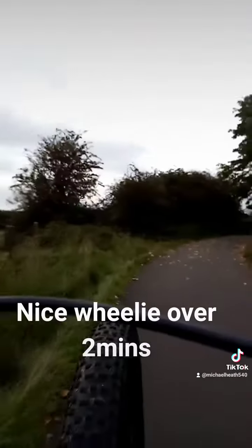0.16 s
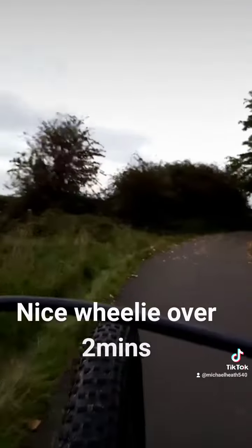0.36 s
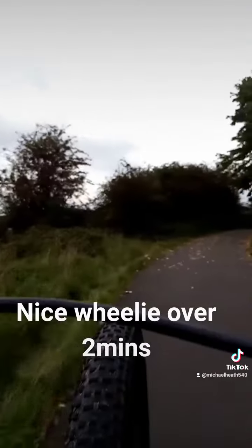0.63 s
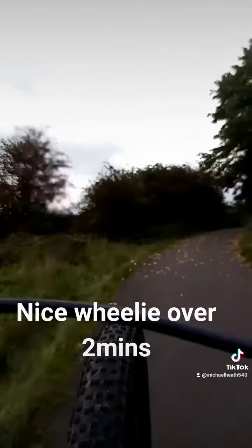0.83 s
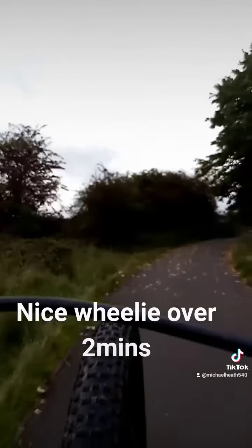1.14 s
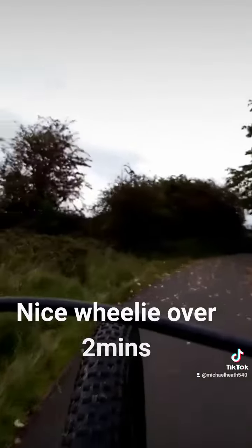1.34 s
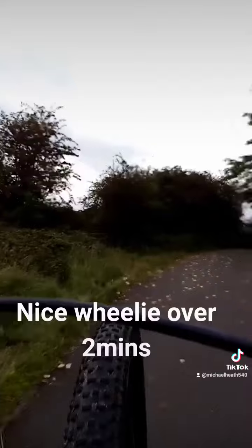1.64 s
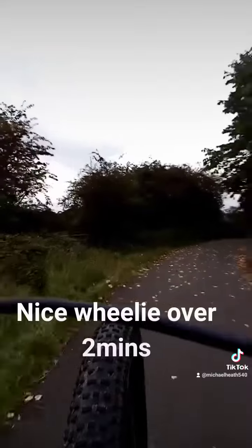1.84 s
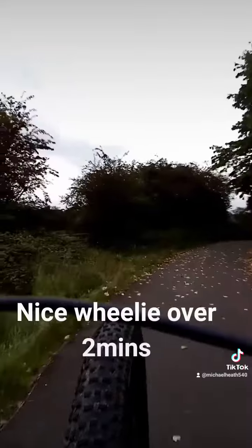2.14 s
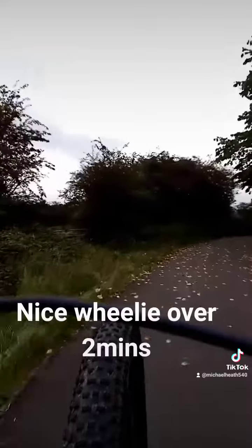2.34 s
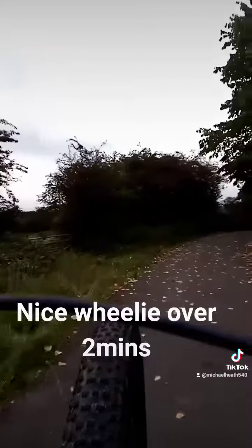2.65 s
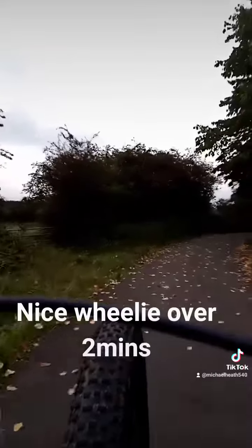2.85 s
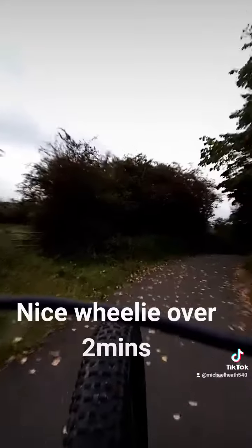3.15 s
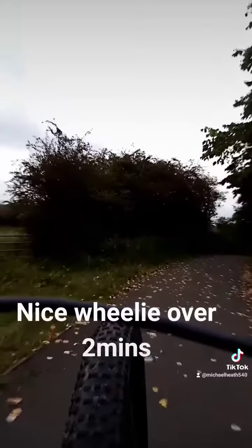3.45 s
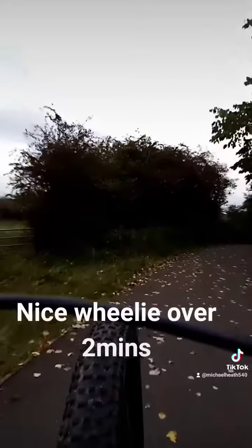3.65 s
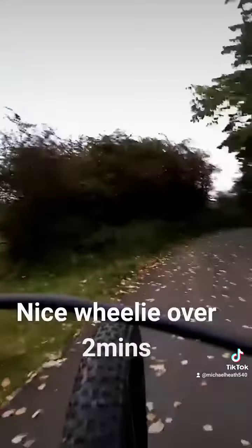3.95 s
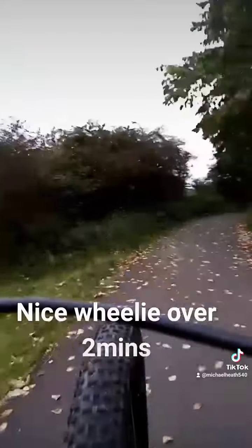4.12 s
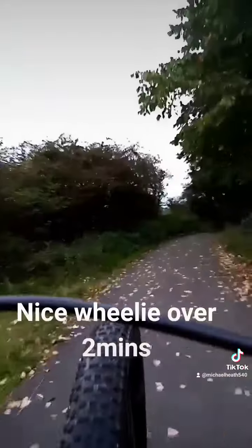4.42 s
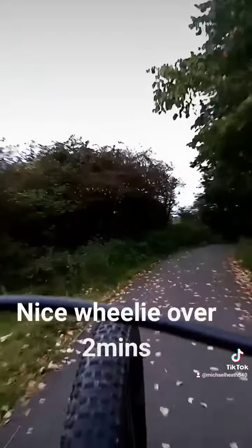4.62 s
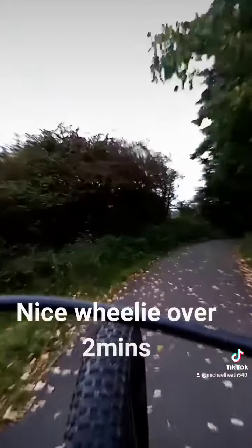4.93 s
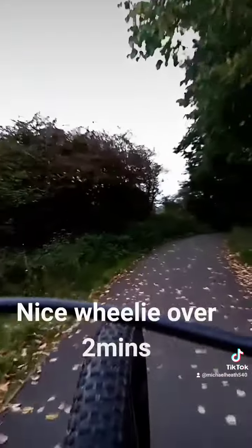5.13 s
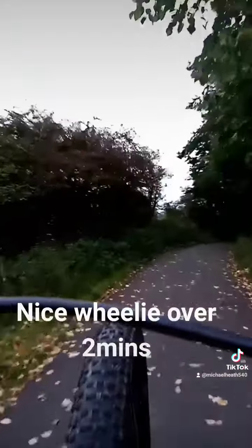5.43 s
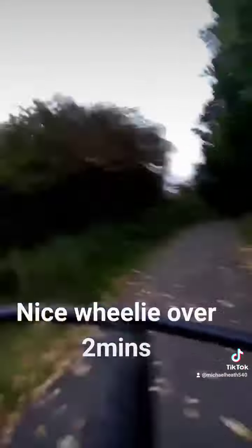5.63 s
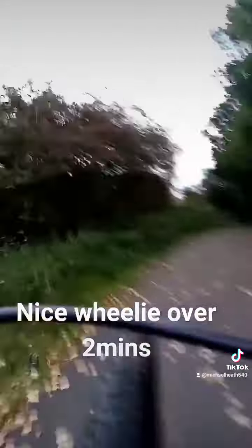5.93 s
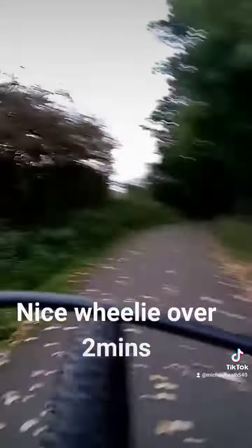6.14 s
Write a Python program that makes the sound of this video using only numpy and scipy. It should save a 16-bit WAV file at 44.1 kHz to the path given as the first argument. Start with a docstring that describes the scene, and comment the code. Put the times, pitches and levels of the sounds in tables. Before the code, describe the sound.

A bicycle rolls along a leafy tarmac path, heard close by a phone moving with the rider. Low headwind buffets the microphone over faint tyre roar and hiss. Two piercing stone pings come just before one second, followed by grit snaps and leaf crackles. The freewheel ticks rapidly around three seconds, then a clatter. Near the end, more ticks lead into a dense burst of loud cracks, knocks and stronger wind.

```python
"""A bicycle rolls along a leaf-strewn tarmac path, heard by a phone carried by the rider.
Its knobbly tyre roars and hisses as fluttering coloured noise; leaves, grit and frame taps are crackling bursts.
The freewheel ticks in bright ringing bursts while the pedals rest; the chain clicks faintly and thinly.
Headwind buffets the two microphone ports as gusting low noise and swings of pressure; a small bird whistles
falling tones. The left port is muffled and nearer."""
import sys
import numpy as np
from scipy import signal
from scipy.fft import rfft, irfft
from scipy.io import wavfile
from scipy.ndimage import uniform_filter1d

SR = 44100
rng = np.random.default_rng(int(sys.argv[2]) if len(sys.argv) > 2 else 0)


def linear_from_db(decibels):
    """Turn decibels (scalar or array-like) into linear amplitude factors; 0 gives 1."""
    return 10 ** (np.asarray(decibels, float) / 20)


def wav_record(signal):
    """Record a signal, one row per channel, as 16-bit PCM in the file named by sys.argv[1]."""
    frames = np.transpose(np.atleast_2d(signal))
    bounded = np.clip(frames, -1, 1)
    # unit amplitude maps onto the largest positive 16-bit level
    quanta = np.round(bounded * 32767).astype(np.int16)
    wavfile.write(sys.argv[1], SR, quanta)


N = 276948
TIME = np.arange(N) / SR  # seconds
TOP_FADE_DB_PER_S = 1  # the highest treble thins out along the path

# Levels are relative: each layer sets its own gain on top.
# Rolling. Each row: time in seconds, tyre load in dB, grit under the tread in dB.
ROLLING = [(0.0, -66.5, -67.5), (0.47, -65, -70.5), (0.96, -64.5, -62), (1.12, -65.5, -69.5),
           (1.36, -66, -72), (1.48, -64.5, -73.5), (1.85, -66.5, -69.5), (2.04, -67, -76.5),
           (2.66, -65, -68.5), (3.27, -64.5, -71.5), (3.97, -64.5, -69.5), (4.35, -62.5, -66.5),
           (4.98, -62, -72), (5.37, -64, -65), (5.56, -65, -63.5), (5.68, -60, -59), (5.96, -60.5, -65.5),
           (6.28, -56.5, -65)]
# Low roar of the tyre. Each row: frequency in Hz, level in dB.
ROAR_COLOUR = [(140, 5), (190, 22), (250, -9.5), (500, 0), (690, -1), (780, 5), (880, 2.5), (1200, 0.5),
               (1900, -13), (2250, -7), (2750, -9), (3050, -32), (4000, -26), (6000, -35.5)]
# Gritty hiss of the tread. Each row: frequency in Hz, level in dB.
HISS_COLOUR = [(1000, -3), (2500, 2.5), (4000, -7), (5200, -2.5), (6500, 1), (7600, 0.5), (9000, -7.5),
               (10500, -8.5), (13000, -23)]
# Thin whirr, also the tint of the fine ticks. Each row: frequency in Hz, level in dB.
WHIRR_COLOUR = [(3500, -20), (7000, -5.5), (9500, -5), (12000, 3), (14000, -1), (15200, 7.5), (16500, -4.5)]
# Grit snapping out from the tread. Each row: start in seconds, snap in dB, dullness in dB, frame knock in dB.
GRIT_CRACKS = [(0.105, -48, 11.5, -54), (0.973, -34.5, -7, -75), (1.3715, -33.5, 8.5, -60),
               (1.62, -59, 21, -45), (1.838, -56.5, 27.5, -69), (3.01, -48, -10, -76),
               (3.2693, -53, 17.5, -70), (3.632, -41, 4, -36), (3.6348, -46, 8, -35.5),
               (3.6394, -32, -13, -48), (3.644, -35, -4, -52), (5.5717, -30, 12, -37.5),
               (5.5757, -33, 16, -39), (5.5805, -38, 11, -40), (5.5912, -49, 11, -46),
               (5.6012, -7.5, -6.5, -34), (5.6037, -26, -8, -41), (5.6074, -34, 17, -41),
               (5.6345, -36, -5, -46), (5.646, -37.5, 8, -46), (5.682, -52, 10, -37.5),
               (5.6915, -18.5, -10, -35.5), (5.6944, -25.5, 0, -46), (5.6985, -22.5, -6, -41),
               (5.7079, -19, 1, -48), (5.7108, -27, 4, -45), (5.7157, -30, -14, -47)]
# Dry leaves crushed under the tyre.
# Each row: loudest crack in seconds, snap in dB, scuff in dB, mid crackle in dB, base fade in ms.
LEAF_CRUNCHES = [(1.0856, -30, -45, -52, 11.4), (1.105, -44.5, -59, -67, 28), (1.3251, -38.5, -52, -62, 40),
                 (1.4032, -40.5, -53.5, -60, 21), (1.5476, -39, -38, -52, 23), (2.4003, -50, -61, -73, 75),
                 (2.986, -39, -70, -74, 30), (3.631, -47, -37.5, -42, 17.7), (3.668, -47, -55.5, -59, 55),
                 (3.726, -46, -56.5, -68, 81), (4.7876, -47, -56, -54, 12), (5.0142, -48, -62, -69, 58),
                 (5.5732, -25, -27.5, -26, 9.2), (5.62, -56, -45, -58, 32), (5.6558, -54, -46, -57, 22),
                 (5.664, -55, -53, -56, 20), (5.693, -48, -49, -50, 24), (5.7163, -34, -53, -56, 4.4),
                 (5.727, -40, -57, -59, 12)]
# Crisp snap of grit and leaves. Each row: frequency in Hz, level in dB.
SNAP_COLOUR = [(1200, -48), (2500, -28), (3400, -7.5), (4050, -8.5), (4800, -5.5), (5600, 2), (6400, 4),
               (7200, 1), (8200, -13), (10000, -39), (14000, -77)]
# Knock of grit on the frame. Each row: frequency in Hz, level in dB.
KNOCK_COLOUR = [(300, -4), (600, 3.5), (1200, 10.5), (1800, -6.5), (3000, -61), (5000, -52)]
# Mid click of grit and leaves. Each row: frequency in Hz, level in dB.
CLICK_COLOUR = [(400, -50), (800, -6), (1400, -5), (1900, -11), (2200, -5), (3000, -2.5), (3400, -2),
                (4100, -13), (6000, -5.5), (10000, -47.5)]
# Airy top of grit and leaves. Each row: frequency in Hz, level in dB.
TOP_COLOUR = [(4000, -7.5), (7000, 9), (9500, 3), (12500, -3.5), (13500, -1), (15000, 6), (17000, -28)]
# Low scuff of leaves. Each row: frequency in Hz, level in dB.
SCUFF_COLOUR = [(250, -16), (500, 0.5), (750, 0.5), (1300, -6), (2000, -12), (3500, -24.5), (8000, -43)]
# Sharp pings of a stone against the rim. Each row: start in seconds, ping in dB, low body in dB.
RIM_PINGS = [(0.7974, -5, -44.5), (0.9368, -11, -32)]
# Bright ping. Each row: frequency in Hz, level in dB.
PING_COLOUR = [(450, -33.5), (800, -14.5), (1430, -11), (2000, -14.5), (3000, -6), (4050, -6), (5000, -11),
               (6300, -1.5), (7200, -3.5), (8200, -19.5), (10300, -12.5), (11300, -19), (12300, -11),
               (13500, -19), (15200, 0), (17000, -46)]
# Dull taps on the frame. Each row: start in seconds, tap in dB, low body in dB, contact in ms.
FRAME_TAPS = [(3.6638, -34, -33, 0.4), (5.7362, -22.5, -33, 2.2), (5.8877, -26.5, -47, 0.92),
              (6.0258, -27.5, -36, 0.44), (6.162, -41.5, -36, 3.1)]
# Blunt tap. Each row: frequency in Hz, level in dB.
TAP_COLOUR = [(350, -20), (750, 3.5), (1300, 11), (1900, -3), (2500, -0.5), (3200, 4.5), (5000, -11.5),
              (6500, -3), (8000, -36), (15000, -38)]
# Low body under taps and pings. Each row: frequency in Hz, level in dB.
BODY_COLOUR = [(300, -14), (600, -1.5), (1000, 3.5), (1500, 0.5), (2500, -21), (5000, -39)]
# Soft hollow knocks. Each row: start in seconds, level in dB.
SOFT_KNOCKS = [(2.8255, -59), (2.876, -49.5), (2.8838, -51), (3.729, -54), (3.744, -61.5), (5.255, -49.5),
               (5.313, -58)]
# Hollow note. Each row: frequency in Hz, level in dB.
HOLLOW_COLOUR = [(1200, -28), (1900, -6), (2400, 0), (3000, -7), (3800, -13), (6000, -24)]
# Thin high ticks of fine grit. Each row: time in seconds, level in dB.
FINE_TICKS = [(0.0495, -53), (0.176, -54), (0.307, -58), (0.4569, -70), (0.5743, -46.5), (1.626, -57),
              (1.6841, -56), (1.6954, -54), (1.7779, -59), (1.878, -52), (1.904, -55), (2.027, -55.5),
              (2.1006, -74), (5.3134, -79)]
# Freewheel pawls dropping over the ratchet. Each row: start in seconds, level in dB.
PAWL_DROPS = [(3.1034, -45.5), (3.141, -37.5), (3.1772, -39), (3.211, -40), (3.2485, -41), (3.2938, -41),
              (3.342, -39), (3.3906, -40), (3.441, -40), (3.4896, -42), (3.5435, -39.5), (5.3775, -42),
              (5.416, -40.5), (5.4482, -40.5), (5.48, -40)]
# Ring of the hub shell. Each row: frequency in Hz, level in dB.
HUB_COLOUR = [(3500, -21), (4800, -9), (5900, 6.5), (6800, 4), (7800, -3), (9500, -26), (16000, -36)]
# Bright click of the pawls. Each row: frequency in Hz, level in dB.
PAWL_COLOUR = [(3000, -30), (7000, -17), (9500, -3.5), (11500, -6), (13000, 0), (14900, 2), (17000, -14.5)]
# Clearer chain links seating on the teeth. Each row: start in seconds, level in dB.
CLEAR_LINKS = [(0.126, -49.5), (0.349, -48.5), (0.4566, -46), (0.52, -46), (0.5724, -58), (0.623, -46),
               (0.763, -47), (0.922, -51), (0.9575, -49), (1.287, -47), (1.4223, -50), (1.4306, -48),
               (1.6534, -54), (1.878, -63), (1.9044, -53), (1.938, -49.5), (2.024, -59.5), (2.2486, -52.5),
               (2.641, -59), (2.794, -48.5), (2.9612, -49), (4.643, -47.5), (4.7547, -49.5), (5.3386, -79),
               (6.092, -44.5)]
# Chain click. Each row: frequency in Hz, level in dB.
LINK_COLOUR = [(1500, -9), (3000, -21), (4500, -9), (6500, 1.5), (8000, -4), (11000, -15.5), (14000, -17.5),
               (15300, -16.5), (17000, -29)]
# Headwind. Each row: time in seconds, strength in dB.
HEADWIND = [(0.0, -33.5), (0.31, -44), (0.4, -37.5), (0.86, -44.5), (1.29, -38.5), (1.99, -41), (2.03, -39),
            (2.75, -45), (2.99, -37.5), (3.51, -37.5), (3.55, -40.5), (4.35, -45), (4.56, -43),
            (4.6, -50.5), (4.88, -36.5), (5.07, -45), (5.12, -38.5), (5.46, -39), (5.47, -32.5),
            (5.53, -36), (5.61, -39), (5.65, -37), (5.68, -34.5), (5.72, -31.5), (5.75, -36), (5.8, -32),
            (5.84, -38.5), (5.88, -35), (5.92, -34), (5.96, -37), (6.0, -36.5), (6.07, -32.5),
            (6.12, -34.5), (6.17, -33), (6.24, -33), (6.28, -30)]
# Low buffeting, left port. Each row: frequency in Hz, level in dB.
WIND_LEFT_COLOUR = [(25, -61), (40, -21), (55, -2.5), (78, 6.5), (105, 10), (145, 3.5), (200, -2),
                    (270, -11.5), (380, -21), (800, -55.5), (1600, -98)]
# Low buffeting, right port. Each row: frequency in Hz, level in dB.
WIND_RIGHT_COLOUR = [(25, -55.5), (50, -15.5), (100, -1), (160, 1), (250, -6.5), (400, -22.5), (800, -82)]
# Brighter part of the wind, right port only. Each row: frequency in Hz, level in dB.
WIND_UPPER_COLOUR = [(120, -34.5), (250, -3.5), (380, -4.5), (550, -16), (900, -32), (1500, -62.5)]
# Strong eddies that slap the right port. Each row: start in seconds, approximate peak in dB, pitch in Hz.
WIND_SLAPS = [(0.015, -29.5, 423), (0.165, -37, 377), (0.238, -35, 344), (0.5, -31, 347), (0.55, -30, 413),
              (0.633, -36.5, 350), (0.835, -36, 374), (0.89, -34, 275), (1.295, -35, 403), (1.34, -37, 377),
              (1.548, -30.5, 270), (1.647, -29.5, 282), (2.034, -31.5, 266), (2.412, -35.5, 396),
              (2.58, -31, 296), (2.889, -27.5, 292), (3.099, -30, 288), (3.23, -30, 293), (3.415, -32, 277),
              (3.49, -20.5, 263), (3.566, -29, 283), (3.652, -36, 206), (4.419, -35, 314),
              (4.846, -33, 298), (4.878, -31.5, 390), (4.889, -24, 198), (4.936, -24.5, 317),
              (5.042, -33, 474), (5.473, -21, 306), (5.487, -18.5, 543), (5.509, -22.5, 242),
              (5.578, -26, 485), (5.592, -27, 330), (5.707, -26.5, 400), (5.762, -26, 443),
              (5.776, -16, 510), (5.787, -22.5, 490), (5.815, -31, 354), (5.895, -19, 393),
              (5.927, -25.5, 268), (5.979, -43, 280), (6.012, -30, 337), (6.041, -24, 340),
              (6.075, -26, 250), (6.109, -27.5, 350), (6.138, -22, 360), (6.188, -19.5, 308),
              (6.2, -33.5, 770), (6.229, -22.5, 405), (6.241, -14.5, 313)]
# Falling whistles. Each row: start in seconds, length in seconds, first pitch in Hz, level in dB.
WHISTLES = [(0.16, 0.128, 7250, -63), (0.352, 0.085, 7000, -63)]
# Muffling of the left port. Each row: frequency in Hz, level in dB.
LEFT_PORT_COLOUR = [(300, 2.5), (600, 1), (780, -0.5), (1000, -3), (1900, 0.5), (2400, -7), (3200, -1),
                    (4000, -1.5), (6500, -7), (7200, -25), (8200, -51.5), (10000, -64.5), (16000, -68.5)]


def colour(x, points):
    """Causal filter through (Hz, dB) points, from the cepstrum of the log gain; white noise keeps its power."""
    hz, db = np.transpose(points)
    grid_hz = np.linspace(1, SR / 2, 4097)
    gain = linear_from_db(np.interp(np.log(grid_hz), np.log(hz), db))
    folded = irfft(np.log(gain / np.sqrt(np.mean(gain ** 2))))
    # folding the cepstrum onto positive time gives minimum phase
    folded[1:4096] *= 2
    folded[4097:] = 0
    impulse = irfft(np.exp(rfft(folded)))
    return signal.fftconvolve(np.atleast_2d(x), impulse[None], axes=1)[:, :N]


def curve(table):
    """Columns of a time table, interpolated at every sample."""
    s, *columns = np.transpose(table)
    return [np.interp(TIME, s, column) for column in columns]


def walk(rate):
    """Random levels held 1 / rate s and slewed twice; spread near 1."""
    k = int(SR / rate)
    steps = np.repeat(rng.standard_normal(N // k + 1), k)
    return 1.39 * uniform_filter1d(uniform_filter1d(steps, k), k)[:N]


def noise():
    """White noise of power 1."""
    return rng.standard_normal(N)


def bursts(s, db, left_db, hold_ms, fade_ms, grain, apart=0.13, blow=0., clump_db=0.):
    """Crackling noise that rises fast, holds and dies away, one burst an event; rows left, right.
    apart is the amount of unrelated noise added to the burst at the left port;
    blow is a single hard contact after the rise."""
    out = np.zeros((2, N + 4096))
    ms = np.arange(4096) / SR * 1000
    contact = blow * (np.arange(4096) == 48)  # about 1.1 ms in
    chance = rng.standard_normal((len(s), 3, 4096))
    events = np.broadcast_arrays(s, linear_from_db(db), linear_from_db(left_db), hold_ms, fade_ms)
    for at, gain, left, hold, fade, (white, other, rough) in zip(*events, chance):
        white = white + contact
        shape = np.minimum(ms / 0.73, 1) * np.exp(-np.maximum(ms - hold, 0) / max(fade, .1))
        # crackles of about half a ms, then lumps of about 3 ms
        shape *= linear_from_db(grain * 9.4 * uniform_filter1d(rough, size=20))
        shape *= linear_from_db(clump_db * np.sqrt(130) * uniform_filter1d(rough[::-1], size=130))
        # the level is the rms over rise, hold and first fade
        loud_part = (shape * white)[:int((1 + hold + fade) * SR / 1000)]
        shape *= gain / np.sqrt(np.mean(loud_part ** 2))
        first = int(at * SR)
        out[:, first:first + 4096] += shape * [left * (white + apart * other), white]
    return out[:, :N]


def gritty(flutter_db, rate, grain_db):
    """Fluttering noise with stray grains of widely different sizes, about rate of them a second."""
    size = linear_from_db(grain_db + 6.2 * rng.exponential(size=N).clip(0, 3))
    grains = (rng.random(N) < rate / SR) * size * np.sign(noise())
    return noise() * linear_from_db(flutter_db * walk(70) + 2.2 * walk(23.96)) + grains


def tyre():
    """Tread blocks roar and hum on the tarmac; a gritty hiss and a thin fading whirr lie above."""
    load_db, grit_db = curve(ROLLING)
    rumble = noise() * linear_from_db(1.5 * walk(60))
    tread, drive = gritty(2.6, 460.0, 6.3), gritty(2.3, 100.0, 9.1)
    # the left port hears mostly what comes back off the verge
    roar = colour([0.23 * rumble + 1.0 * noise(), rumble], ROAR_COLOUR) * linear_from_db(load_db + 11.0)
    left_tread = 0.21 * tread + 0.92 * gritty(7.93, 87.0, 5.9)
    hiss = colour([left_tread, tread], HISS_COLOUR) * linear_from_db(grit_db + 4.5)
    whirr_db = grit_db - 0.5 - TOP_FADE_DB_PER_S * TIME + 2.0 * walk(23)
    whirr = colour(0.54 * drive + 0.38 * tread, WHIRR_COLOUR) * linear_from_db(whirr_db)
    return roar + hiss + whirr


def breaks(s, pan_db, hold_ms, grain, tail_db, parts, hard=0., clump_db=0.):
    """Each part is (colour, dB, fade ms, extra dB at the left port), with a short scatter off bicycle and ground."""
    out = 0
    for points, db, fade_ms, extra_db in parts:
        left_db = pan_db + extra_db
        blow = bursts(s, db, left_db, hold_ms, fade_ms, grain, apart=0.47, blow=hard, clump_db=clump_db)
        scatter = bursts(s, db + tail_db, left_db, 5.5, 3.8, 0.63, apart=2.6)
        out = out + colour(blow + scatter, points)
    return out


def grit():
    """A stone lets go at once: a hard contact and a very short burst in four colours."""
    s, snap_db, dull_db, knock_db = np.transpose(GRIT_CRACKS)
    # duller stones are more even between the ports and lack top
    pan_db = -19 + 0.17 * dull_db
    top_db = snap_db - 0.57 * np.maximum(dull_db, 0) - TOP_FADE_DB_PER_S * s - 4.5
    parts = [(SNAP_COLOUR, snap_db - 5.5, .6, 9.),
             (KNOCK_COLOUR, knock_db + 7.0, .8, 5.),
             (CLICK_COLOUR, snap_db + dull_db - 12.0, .6, 7.),
             (TOP_COLOUR, top_db, .45, 9.)]
    return breaks(s, pan_db, hold_ms=0.24, grain=-2.0, tail_db=-19, parts=parts, hard=16.)


def leaves():
    """A leaf crumbles over a longer contact, the lows longest; it begins just before its loudest crack."""
    s, snap_db, scuff_db, click_db, ms = np.transpose(LEAF_CRUNCHES)
    # scuffy leaves have less top
    top_db = snap_db - 0.41 * (scuff_db - snap_db) - 19.5
    parts = [(SNAP_COLOUR, snap_db - 13.0, 0.54 * ms, -3.),
             (SCUFF_COLOUR, scuff_db + 0.5, 1.0 * ms, -4.),
             (CLICK_COLOUR, click_db, 0.86 * ms, -3.),
             (TOP_COLOUR, top_db, 0.66 * ms, -3.)]
    return breaks(s - .0015, 0, hold_ms=2.0 + 0.035 * ms, grain=2.0, tail_db=-8.5, parts=parts, clump_db=3.5)


def rim_pings():
    """A stone strikes the rim: one sharp blow, a low body and a scatter 2 ms behind."""
    s, db, body_db = np.transpose(RIM_PINGS)
    body = bursts(s, body_db, -11.5, 0.64, 0.78, 0.4, blow=12.)
    sharp = bursts(s, db - 8.0, -7.0, 1.5, 0.6, 0.6, apart=2.5, blow=9.)
    scatter = bursts(s + .002, db - 27, 3.0, 1.0, 3.8, 1.1, apart=1.8)
    return colour(body, BODY_COLOUR) + colour(sharp + scatter, PING_COLOUR)


def frame_taps():
    """Single blunt blows on the frame that keep one colour, over a low body."""
    s, db, body_db, ms = np.transpose(FRAME_TAPS)
    blunt = bursts(s, db - 0.5, 0.43, ms, 0.63, 0.43, blow=12.)
    body = bursts(s, body_db, 0.46, ms, 0.57, 0.43, blow=12.)
    return colour(blunt, TAP_COLOUR) + colour(body, BODY_COLOUR)


def hollow_knocks():
    """Softer blows, all with one hollow note."""
    s, db = np.transpose(SOFT_KNOCKS)
    return colour(bursts(s, db, 0.0, 1.8, 3.8, 0.5, blow=7.4), HOLLOW_COLOUR)


def ticks():
    """Fine grit pings off the spokes, almost all top; the faint ones fade along the path."""
    s, db = np.transpose(FINE_TICKS)
    at, size = rng.random((40, 2)).T  # faint ticks at random moments
    at = at * N / SR
    faint_db = -56 + 8.0 * (size - .5) - TOP_FADE_DB_PER_S * at
    s, db = np.append(s, at), np.append(db, faint_db)
    return colour(bursts(s - .001, db + 0.5, -4.0, 1.0, 0.86, 3.0), WHIRR_COLOUR)


def freewheel():
    """Each pawl drop rings the hub shell and clicks brightly 0.7 ms later, both with a quieter, longer tail."""
    s, db = np.transpose(PAWL_DROPS)
    ring = bursts(s, db - 5.0, -26.0, 5.9, 2.2, 1.6)
    ring += bursts(s, db - 21.0, 7.0, 9.5, 9.7, 1.2)
    click = bursts(s + .0007, db - 6.0, -26.0, 5.7, 2.2, 1.6)
    click += bursts(s, db - 19, 0.1, 14.0, 10.5, 1.2)  # the tail starts with the ring
    return colour(ring, HUB_COLOUR) + colour(click, PAWL_COLOUR)


def chain():
    """Links seat on the teeth in short thin clicks, some clear and others faint at random moments."""
    s, db = np.transpose(CLEAR_LINKS)
    at, size = rng.random((30, 2)).T
    faint_db = -51 + 8 * (size - .5)
    s, db = np.append(s, at * N / SR), np.append(db, faint_db)
    return colour(bursts(s, db - 7.0, -1.5, 1.1, 4.5, 2.6), LINK_COLOUR)


def wind_slaps(strength_db):
    """Each eddy is a cycle or two of pressure swing; 40 small ones at random moments follow the wind strength."""
    at, size, pitch = rng.random((40, 3)).T
    small_db = strength_db[(at * N).astype(int)] + 6 + 4.0 * (size - .5)
    small = np.transpose([at * N / SR, small_db, 276 * 1.4 ** (pitch - .5)])
    slaps = np.zeros(N)
    for s, peak_db, hz in np.vstack([WIND_SLAPS, small]):
        cycles = np.clip((TIME - s) * hz, 0, None)
        swing = np.sin(2 * np.pi * cycles) * cycles * np.exp(-cycles / 0.55)
        slaps += linear_from_db(peak_db + 16.5) * swing  # the gain makes up for the low peak of the swing
    return slaps


def wind():
    """Turbulence is unrelated at the two ports; it flutters fast and grows brighter on the right as it strengthens."""
    strength_db, = curve(HEADWIND)
    gust_db = strength_db + 0.5 * walk(24)  # random swells
    sway_db = 1.5 * walk(8)  # random shifts between the ports
    left = colour(noise(), WIND_LEFT_COLOUR) * linear_from_db(0.5 * walk(25))
    left = left * linear_from_db(gust_db + sway_db + 1.5)
    low = colour(noise(), WIND_RIGHT_COLOUR) * linear_from_db(0.43 * walk(25))
    low = low * linear_from_db(gust_db - sway_db + 4.0)
    upper = colour(noise() * linear_from_db(3.5 * walk(60)), WIND_UPPER_COLOUR)
    # -48.5 dB at a strength of -39 dB, gaining 1.97 dB per dB of strength
    upper_db = -48.5 + 1.97 * (gust_db + 39.0)
    upper = upper * linear_from_db(upper_db + 0.71 * walk(23) + 1.9 * walk(45))
    return np.vstack([left, low + upper + wind_slaps(strength_db)])


def bird():
    """Thin tones that slide down, waver and blur on their way through the hedge."""
    fall_oct_per_s = 3.1
    out = np.zeros(N)
    for s, length, first_hz, db in WHISTLES:
        t = np.clip(TIME - s, 0, length)
        hz = first_hz * 2 ** (-fall_oct_per_s * t) * (1 + .012 * walk(400))
        swell = np.sqrt(np.abs(np.sin(np.pi * t / length)))
        out += linear_from_db(db) * swell * np.sin(2 * np.pi * np.cumsum(hz) / SR)
    out *= linear_from_db(4 * walk(150))
    return np.array([linear_from_db(11.0) * out, out])


def scene():
    """Airborne sound reaches the muffled left port first; the wind acts on each port directly."""
    bicycle = tyre() + freewheel() + chain()
    debris = grit() + leaves() + rim_pings() + frame_taps() + hollow_knocks() + ticks()
    left, right = bicycle + debris + bird()
    early = np.roll(left, -25)  # samples of lead
    left = linear_from_db(-11.5) * colour(early, LEFT_PORT_COLOUR)[0]
    return wind() + [left, right]


def top_cut(x):
    """Nothing passes above the cut-off."""
    return signal.sosfilt(signal.butter(12, 16820, fs=SR, output="sos"), x)


def record(dry):
    """The phone cuts the top with a steep low-pass at 15650 Hz."""
    low_pass = signal.ellip(6, .5, 28, 15650, fs=SR, output="sos")  # order, ripple dB, stopband dB, Hz
    mix = signal.sosfilt(low_pass, dry)
    return top_cut(mix)


dry = scene()
out = record(dry)
wav_record(out)
```